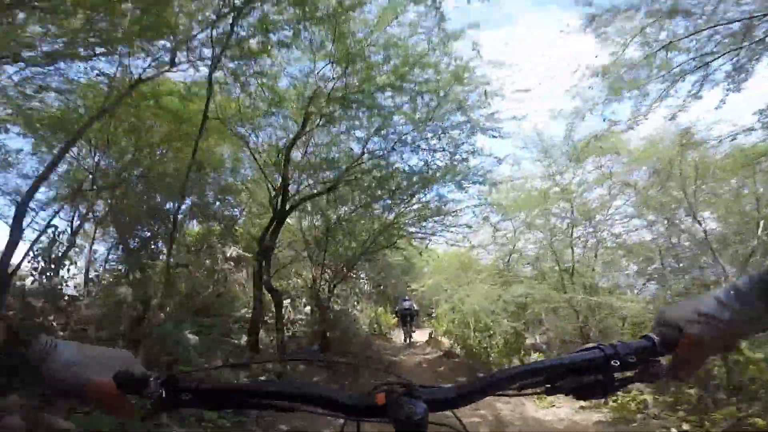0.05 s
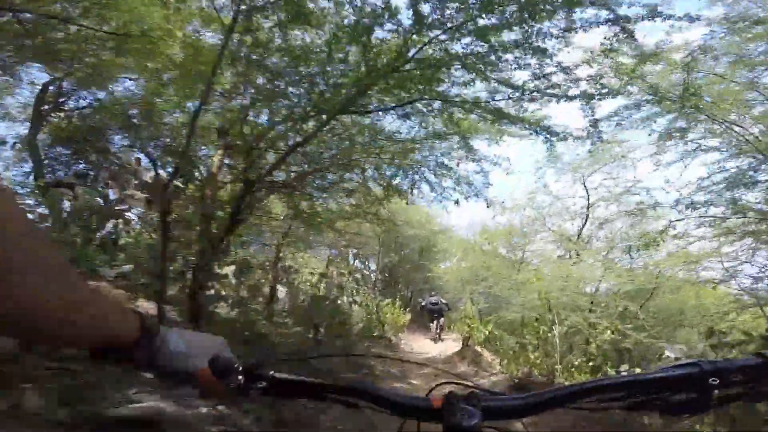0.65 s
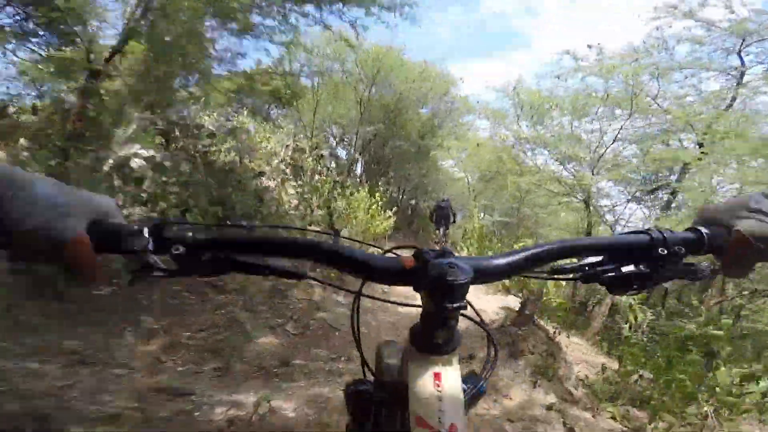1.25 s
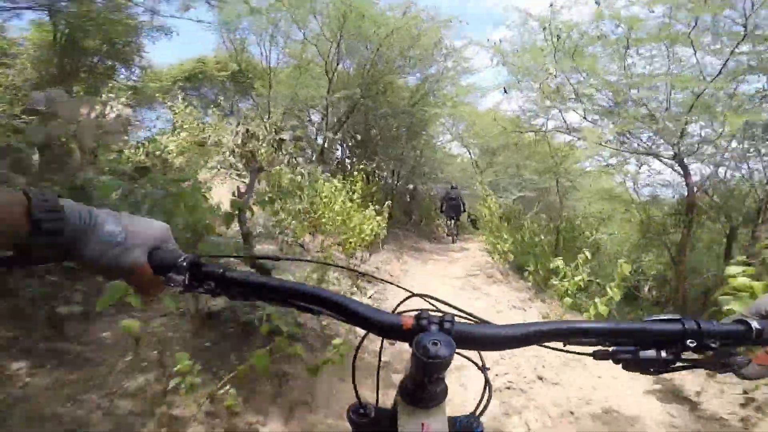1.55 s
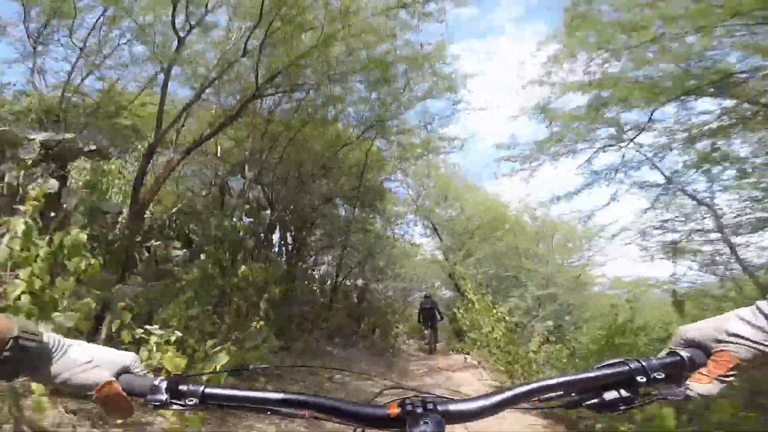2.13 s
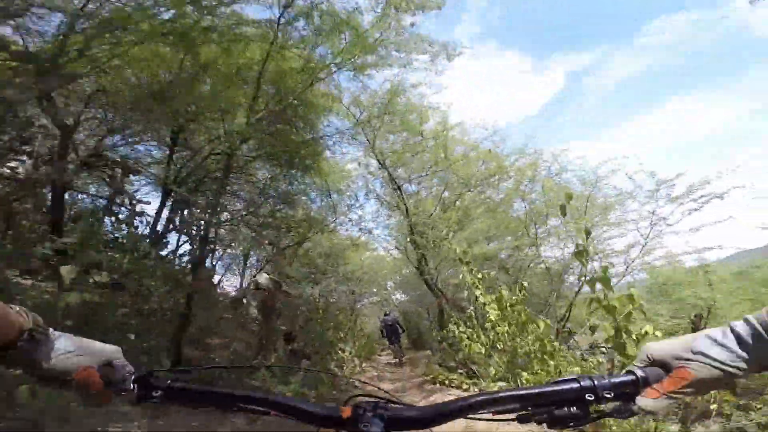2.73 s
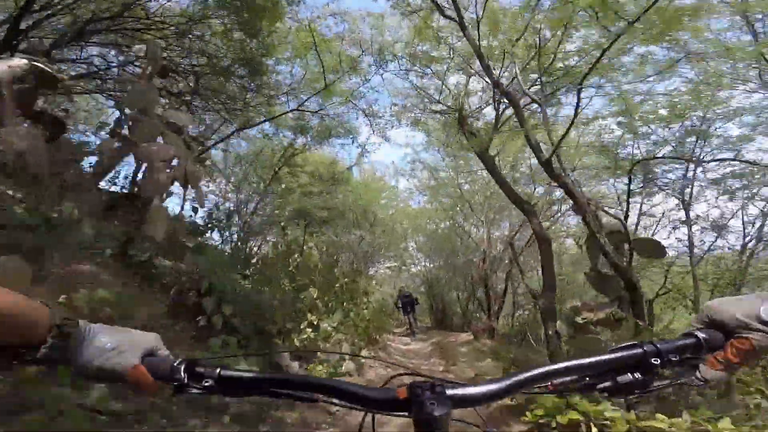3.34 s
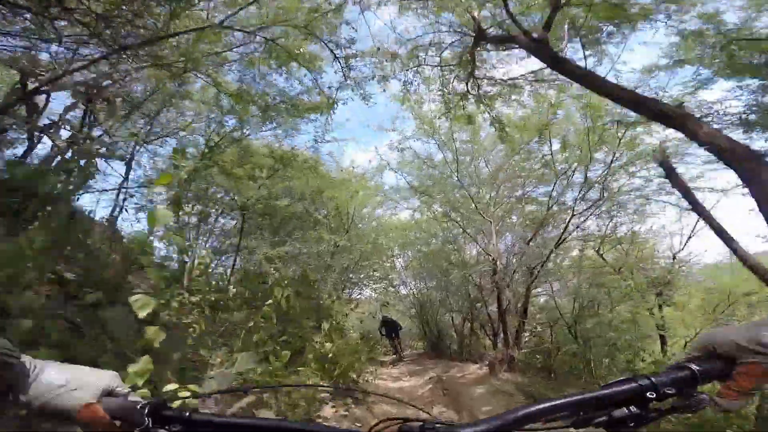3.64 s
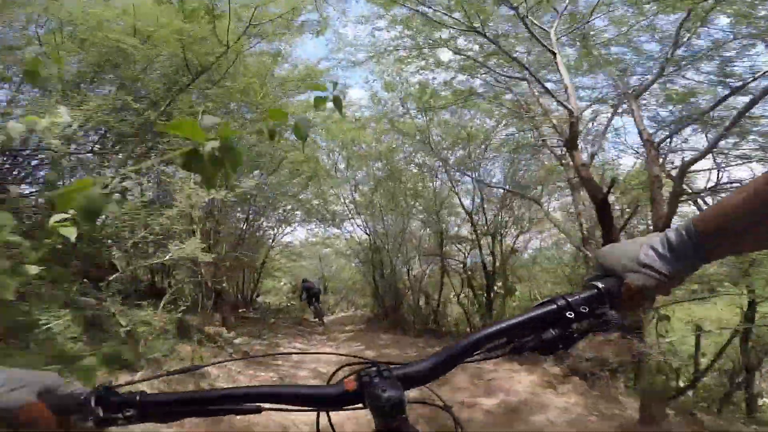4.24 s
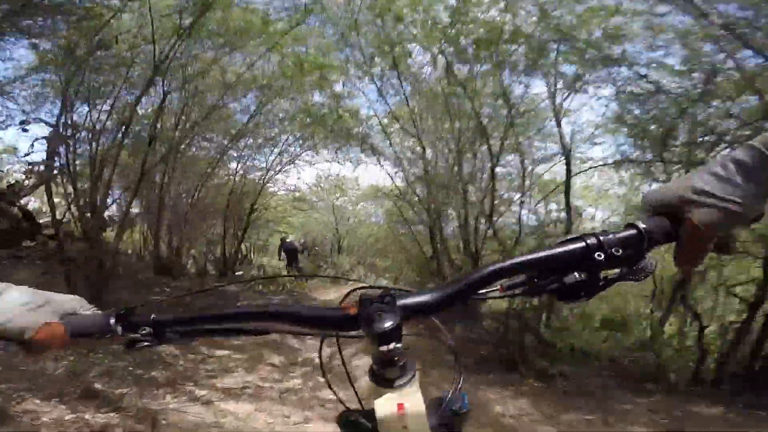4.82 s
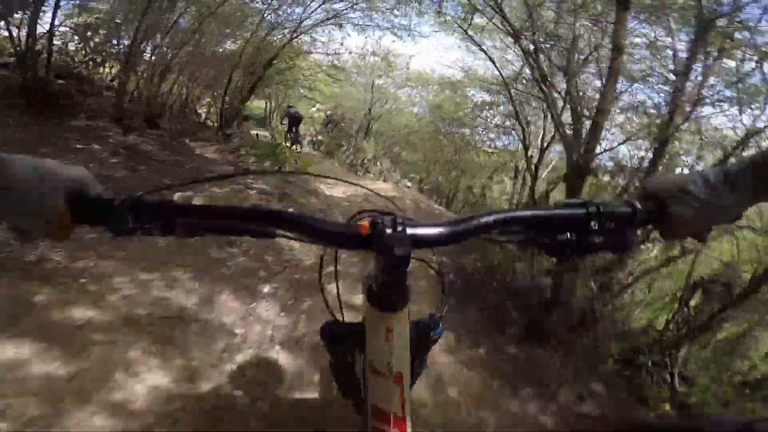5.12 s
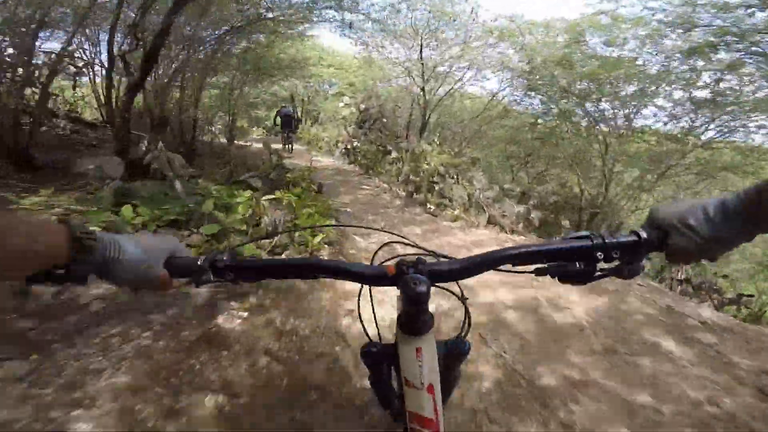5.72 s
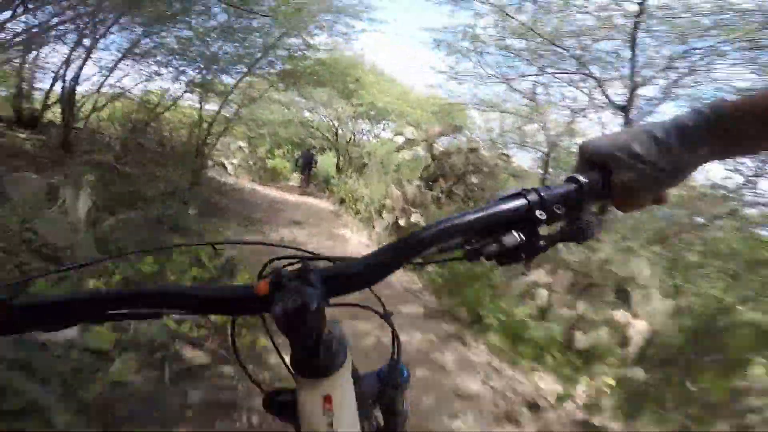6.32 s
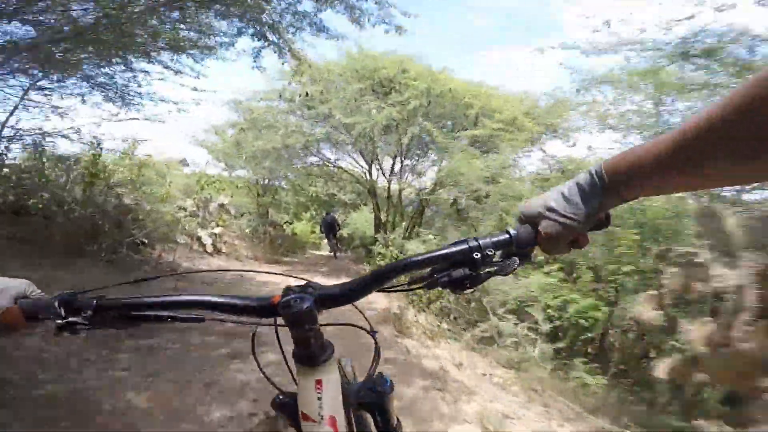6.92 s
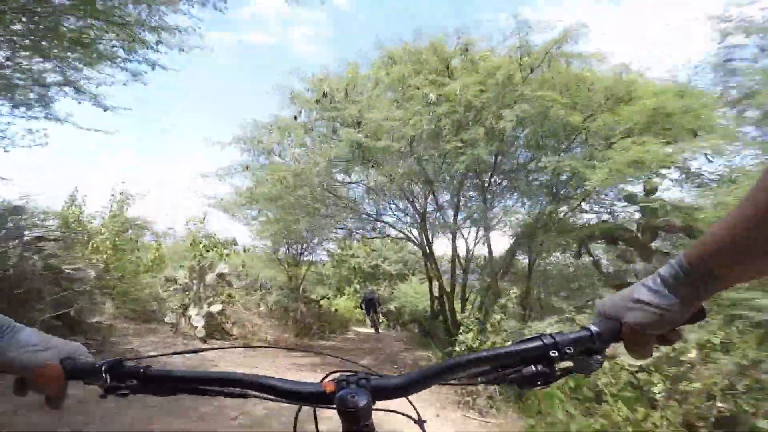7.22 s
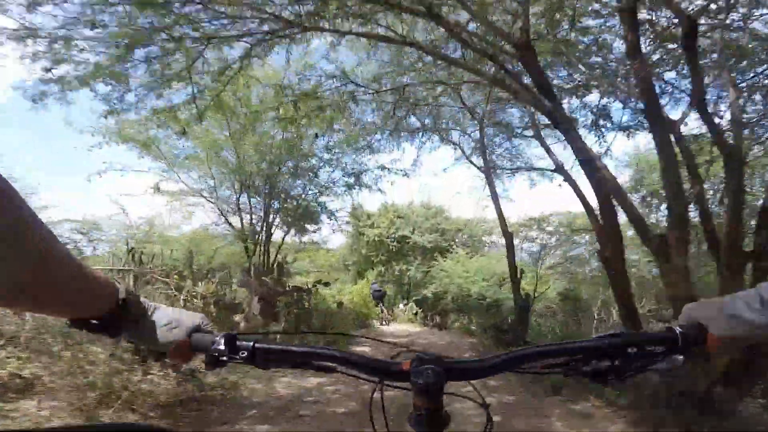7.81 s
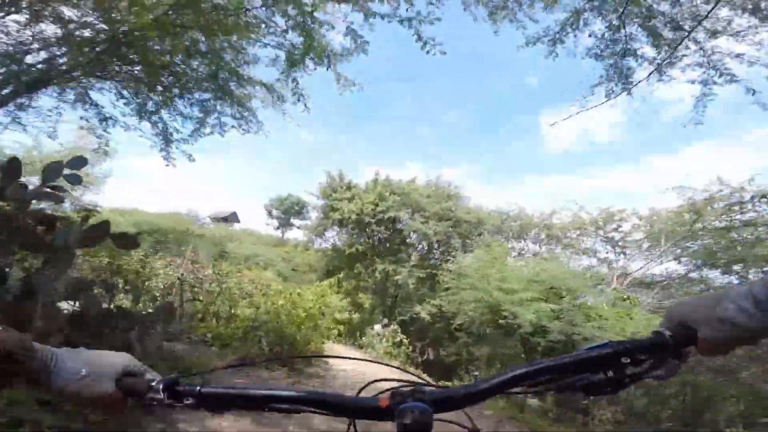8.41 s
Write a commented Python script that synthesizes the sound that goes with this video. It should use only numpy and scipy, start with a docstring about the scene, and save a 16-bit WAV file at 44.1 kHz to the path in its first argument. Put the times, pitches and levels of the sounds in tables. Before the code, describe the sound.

A mountain bike rolls fast over gritty dirt with knocks, chain ticks and a buzzing freehub under loud, gusting wind rumble.

```python
"""Wind rumbles, buffets and slaps on a chest-worn microphone as a mountain bike coasts down a dirt trail.
Low thuds, from wind slaps or bumps, fall in pitch with hollow knocks. Tyres crunch over grit, and hoarse,
breath-like whirs swell and fade. Freehub pawls buzz, chain and cables tick, metal pings, and three hard
snaps and two faint ones ring out. The brakes hiss lightly. A limiter holds the gusts down."""
import sys
import numpy as np
from scipy import signal
from scipy.fft import rfft, irfft, next_fast_len
from scipy.io import wavfile
from scipy.ndimage import uniform_filter1d, minimum_filter1d

SR = 44100
rng = np.random.default_rng(int(sys.argv[2]) if len(sys.argv) > 2 else 0)


def generate_wav(sig):
    """Save sig (samples, or channels by samples) to the path in sys.argv[1] as 16-bit PCM at SR."""
    pcm = np.round(np.clip(np.atleast_2d(sig).T, -1, 1) * 32767).astype(np.int16)
    wavfile.write(sys.argv[1], SR, pcm)


N = 381906

# air speed as rumble, turbulence as buffeting: t/s, relative level/dB
AIR_SPEED = [(0, -25.5), (.17, -16), (.36, -16), (.42, -12.5), (.58, -16), (.67, -15), (.81, -19),
             (.89, -13), (1.16, -16.5), (1.26, -14), (1.58, -16.5), (1.76, -15), (1.82, -17), (1.93, -15.5),
             (2.18, -22), (2.29, -27), (2.38, -30), (2.41, -24), (2.53, -13), (2.63, -20), (2.78, -12.5),
             (2.98, -16.5), (3.06, -16), (3.27, -17.5), (3.32, -23), (3.41, -15.5), (3.8, -18), (4.15, -16),
             (4.25, -14.5), (4.45, -18), (4.66, -18), (4.72, -10.5), (4.83, -14), (4.89, -15), (4.95, -14),
             (5.04, -19), (5.09, -11), (5.49, -17.5), (5.54, -14), (5.68, -11), (5.83, -12), (5.99, -10.5),
             (6.24, -12.5), (6.31, -15.5), (6.5, -14.5), (6.56, -19), (6.73, -12.5), (6.9, -12.5),
             (6.97, -17), (7.04, -14), (7.17, -16.5), (7.25, -15), (7.33, -17), (7.52, -16.5),
             (7.64, -12.5), (7.98, -18), (8.13, -14.5), (8.21, -26), (8.38, -15), (8.5, -21.5),
             (8.64, -15.5)]
TURBULENCE = [(0.0, -24.5), (0.12, -33.5), (0.24, -26), (1.12, -27.5), (1.36, -21.5), (1.52, -33),
              (1.7, -32), (2.0, -22), (2.32, -35), (2.48, -25), (2.64, -33), (2.9, -39), (3.0, -22.5),
              (3.1, -31.5), (3.32, -28), (3.42, -24.5), (3.75, -31.5), (3.92, -25.5), (4.4, -30),
              (4.88, -25.5), (5.08, -29.5), (5.3, -27), (5.42, -37), (5.58, -30), (5.8, -29), (6.2, -40),
              (6.48, -35.5), (6.66, -26.5), (6.84, -38), (7.0, -25.5), (7.14, -40.5), (7.52, -30),
              (7.8, -25.5), (8.0, -25), (8.22, -31), (8.36, -27.5), (8.65, -26.5)]
# large and small eddies: f/Hz, density/dB
RUMBLE_SPECTRUM = [(12, -0.5), (22, 4), (45, 0.5), (70, -3), (95, -5), (122, -6.5), (142, -12.5),
                   (170, -19.5), (300, -105)]
BUFFET_SPECTRUM = [(120, -8), (165, 3), (250, -2.5), (380, -7.5), (520, -13.5), (750, -22), (1200, -48)]

def wind(rumble_trim_db=2, buffet_trim_db=1):
    """Large eddies rock the diaphragm; small ones tear off in quick puffs."""
    eddies = rng.standard_normal(N) * from_db(2.5 * drift(rate_hz=21))
    rumble = even(colour(eddies, RUMBLE_SPECTRUM), span_s=0.049)
    puffs = rng.standard_normal(N) * from_db(3 * drift(rate_hz=35))
    buffet = even(colour(puffs, BUFFET_SPECTRUM), span_s=0.065)
    rumble_db = curve(AIR_SPEED) + rumble_trim_db + 1.2 * drift(rate_hz=8.4)
    buffet_db = curve(TURBULENCE) + buffet_trim_db + 1.5 * drift(rate_hz=8.6)
    return from_db(rumble_db) * rumble + from_db(buffet_db) * buffet


# single eddies: centre t/s, peak level/dB, f/Hz
SLAPS = [(.28, -13, 273), (0.944, -20.5, 210), (1.971, -17.5, 231), (2.53, -16.5, 248), (2.552, -21, 245),
         (2.975, -17.5, 234), (3.056, -14.5, 194), (3.4, -13, 210), (3.538, -16.5, 327), (3.81, -24.5, 266),
         (4.088, -12, 187), (4.578, -14, 206), (4.705, -14.5, 184), (4.89, -20, 231), (5.555, -16, 208),
         (5.819, -14.5, 202), (5.984, -13, 222), (8.397, -12.5, 182.6)]

def slaps(length_s=0.032, tear_hz=450, tear_db=-13):
    """An eddy hits the microphone port; the air in it swings a few times, with a tearing edge."""
    out, swell = np.zeros(N), np.hanning(int(length_s * SR))
    t = np.arange(len(swell)) / SR
    for s, db, hz in SLAPS:
        swing = np.sin(2 * np.pi * (hz * t + rng.random()))
        tear = rms_one(resonate_twice(rng.standard_normal(SR // 5), tear_hz, width_hz=260))[-len(t):]
        add(out, s - length_s / 2, peak_at(swell * (swing + from_db(tear_db) * tear), db))
    return out


# gusts: centre t/s, half-length/s, level/dB, top f/Hz
GUSTS = [(1.331, 0.041, -22, 428), (3.453, 0.015, -36, 390), (3.639, 0.015, -24, 414),
         (4.191, 0.014, -29, 453), (5.125, 0.067, -27, 650), (5.316, 0.022, -34, 530),
         (6.548, .026, -24, 544), (6.645, .04, -37.5, 640), (6.716, 0.011, -29, 523),
         (6.99, 0.026, -31, 510), (5.972, 0.028, -27, 646), (7.375, .018, -31.5, 757),
         (7.858, 0.039, -21, 561), (8.02, 0.022, -33, 428)]

def gusts(lift_octaves=0.585):
    """A gust tears at the port: a short roar whose pitch follows its strength."""
    out, roar = np.zeros(N), hoarse(rng.standard_normal(N), width_hz=380)
    for s, half_s, db, hz in GUSTS:
        swell = np.hanning(int(2 * half_s * SR))
        span = (int(s * SR) + np.arange(len(swell))) % N
        pitch_hz = hz * 2 ** (lift_octaves * (swell - 1))
        add(out, s - half_s, from_db(db) * swell * on_pitch(roar[span], pitch_hz))
    return out


# low thuds with hollow knocks: t/s, thud level/dB, final thud f/Hz, knock level/dB, knock f/Hz
THUDS = [(.169, -19.5, 328, -14.5, 1300), (0.176, -26, 318, -14.5, 1500), (0.184, -18.5, 320, -20.5, 1160),
         (.32, -17.5, 290, -23, 1180), (.457, -13, 306, -16.5, 1030), (0.54, -17.5, 337, -42, 1310),
         (0.666, -12.5, 277, -23, 850), (.753, -26, 453, -29, 800), (.76, -5.5, 253, -18, 1360),
         (0.857, -15.5, 287, -28, 900), (1.776, -6.5, 240, -21, 970), (1.965, -35, 302, -20, 930),
         (2.041, -24, 360, -18.5, 1340), (2.147, -22, 305, -20, 1400), (2.41, -39, 300, -22.5, 1000),
         (2.639, -31, 303, -26.5, 1350), (2.97, -39, 303, -19, 1300), (2.997, -24, 296, -19.5, 1190),
         (3.132, -13, 266, -27, 900), (3.244, -32, 300, -20.5, 1070), (3.28, -37, 300, -21, 1300),
         (3.487, -16, 372, -16.5, 1040), (3.501, -23, 325, -18.5, 1320), (3.72, -13, 295, -18.5, 1250),
         (3.803, -17, 348, -20, 1260), (3.94, -32, 304, -17.5, 1250), (4.039, -24, 380, -17.5, 1250),
         (4.047, -31, 345, -24, 860), (4.373, -38, 300, -24, 1530), (4.436, -12.5, 272, -13.5, 1020),
         (4.847, -28, 300, -18, 1750), (4.983, -39, 298, -20, 1350), (5.095, -30, 523, -9, 950),
         (5.105, -13.5, 400, -18, 900), (5.148, -30, 490, -18, 796), (5.243, -23, 470, -41, 800),
         (5.457, -32, 475, -21.5, 750), (5.643, -17, 470, -27, 650), (5.654, -10, 312, -26, 590),
         (5.66, -13.5, 488, -14.5, 740), (5.734, -36, 300, -20.5, 1370), (5.812, -24, 300, -18, 1110),
         (5.876, -44, 300, -28, 1160), (5.958, -21, 400, -24, 674), (5.979, -18.5, 452, -16, 760),
         (6.036, -39, 300, -26, 1150), (6.134, -22.5, 296, -23, 750), (6.17, -37, 300, -25.5, 1000),
         (6.174, -39, 300, -16.5, 1200), (6.203, -41, 300, -17.5, 1250), (6.302, -45, 300, -21, 1150),
         (6.333, -34, 302, -18, 955), (6.344, -40, 295, -17, 1110), (6.971, -19, 430, -28, 720),
         (7.709, -11, 292, -23, 715), (7.836, -9.5, 238, -12.5, 1020), (7.872, -11, 282, -34, 700),
         (8.273, -22, 400, -27, 835), (8.336, -14, 282, -18, 1090), (8.494, -18.5, 306, -18.5, 1490)]

def thuds(start_ratio=3.36, fall_s=0.001513, rise_s=0.0044, scuff_db=-10):
    """Low thuds, from wind slaps or bumps, swell and fall in pitch, each with a hollow knock."""
    out, t = np.zeros(N), np.arange(SR // 10) / SR
    swell = (t / rise_s * np.exp(1 - t / rise_s)) ** 2
    for s, thud_db, thud_hz, knock_db, knock_hz in THUDS:
        pitch_hz = thud_hz * (1 + (start_ratio - 1) * np.exp(-t / fall_s))
        thud = np.sin(2 * np.pi * (np.cumsum(pitch_hz) / SR + rng.random())) * swell
        scuff = resonate(resonate(burst(t60_s=0.063), hz=423, width_hz=320), hz=506, width_hz=83)
        add(out, s, peak_at(thud, thud_db) + peak_at(scuff, thud_db + scuff_db))
        add(out, s, knock(knock_hz, knock_db))
    return out


def jolts(trim_db, db_per_octave=5.5, reference_hz=1150):
    """Shake from each knock as (t/s, level/dB); hard, high ones stir up more than dull ones."""
    return [(s, db + trim_db + db_per_octave * np.log2(hz / reference_hz)) for s, _, _, db, hz in THUDS]


# hollow frame: f/Hz, level/dB
FRAME_MODES = [(570, -0.5), (720, 4), (920, -1.5), (1160, -4), (1400, -2.5), (1610, -3.5), (1830, -5),
               (2100, -10.5)]

def knock(hz, db, t60_s=0.011, focus_db=14, uneven_db=2.5, detune=0.036, gap_s=0.004, loss_db=9):
    """A contact and two uneven bounces strike the frame's damped modes, most of all those near hz."""
    out, t = np.zeros(SR // 5), np.arange(SR // 25) / SR
    mode_hz, mode_db = np.transpose(FRAME_MODES)
    focused_db = mode_db - focus_db * np.log2(mode_hz / hz) ** 2
    count = len(mode_hz)
    for bounce in range(3):
        gains = from_db(focused_db + uneven_db * rng.standard_normal(count))
        pitches_hz = mode_hz * (1 + detune * rng.standard_normal(count))
        body = (gains * rng.choice([-1, 1], count)) @ np.sin(2 * np.pi * np.outer(pitches_hz, t))
        contact = (t == 0) + 0.28 * np.tanh(burst(t60_s=0.018)[:len(t)])  # impulse plus rattle
        hit = signal.fftconvolve(body * from_db(-60 * t / t60_s), contact)
        add(out, gap_s * bounce * rng.uniform(0.76, 1.1), peak_at(hit, db - loss_db * bounce))
    return out


# tyre grip as crunch between knocks: t/s, relative level/dB
GRIP = [(0.0, -38), (0.84, -36.5), (1.04, -40), (1.36, -35.5), (3.16, -41.5), (3.28, -34.5), (3.64, -41),
        (3.84, -36), (4.2, -40.5), (4.36, -35), (5.16, -38.5), (5.32, -42), (6.32, -37), (6.48, -40.5),
        (7.52, -39.5), (7.92, -34), (8.24, -37.5), (8.65, -32.5)]
# crunch: f/Hz, density/dB
TYRE_SPECTRUM = [(300, 3), (620, 7), (850, 1), (1150, 1), (1650, 1), (2100, -5.5), (2700, -12),
                 (3400, -21.5), (6000, -21.5)]

def tyres(trim_db=0.5, dust_gain=0.97, patchy_db=2):
    """Knobs crush patches of grit over a scrub of dust, louder around each jolt."""
    level_db = stirred(curve(GRIP) + trim_db, jolts(trim_db=-18), attack_s=0.009, release_s=0.034)
    grit = grains(per_s=1200, spread_db=0) + dust_gain * rng.standard_normal(N)
    level_db -= 0.13 * drift(rate_hz=10)
    crunch = colour(grit * from_db(patchy_db * drift(rate_hz=27)), TYRE_SPECTRUM)
    return from_db(level_db) * even(crunch, span_s=0.086)


# breath-like whirs: centre t/s, half-length/s, level/dB, f/Hz, rise/(octaves/s)
WHIRS = [(0.513, 0.068, -37, 1280, 1.5), (0.581, 0.018, -37.5, 1900, 0), (0.821, 0.096, -41.5, 1720, 0),
         (1.735, 0.2, -41, 1680, 0), (2.665, 0.038, -38, 1600, 0.14), (2.735, 0.06, -40, 1640, 0.26),
         (2.76, .13, -44.5, 1863, 0.1), (3.768, 0.06, -35, 1680, 0.14), (3.9, 0.09, -40, 1570, 0.11),
         (4.826, 0.029, -34, 1660, 0.29), (6.244, 0.22, -41.5, 1078, 0.17), (7.025, 0.052, -35, 1050, 1.86),
         (8.522, 0.077, -37, 1600, 0.19)]

def whirs(waver=0.025, rasp_db=3):
    """Hoarse, wavering, breath-like whirs swell and fade."""
    out = np.zeros(N)
    rasp = hoarse(grains(per_s=900, spread_db=2), width_hz=280) * from_db(rasp_db * drift(rate_hz=50))
    bend = 1 + waver * drift(rate_hz=9.1)
    for s, half_s, db, hz, octaves_per_s in WHIRS:
        swell = np.hanning(int(2 * half_s * SR))
        steps = np.arange(len(swell))
        span = (int(s * SR) + steps) % N
        pitch_hz = hz * bend[span] * 2 ** (octaves_per_s * (steps / SR - half_s))
        add(out, s - half_s, from_db(db) * swell * on_pitch(rasp[span], pitch_hz))
    return out


# metal snaps: t/s, rms level/dB, t60/s, knock level/dB, contact cut-off f/Hz, crack f/Hz
SNAPS = [(1.8943, -24, .013, -32, 12000, 13200), (1.988, -42, .02, -45, 12000, 7000),
         (3.3208, -26.5, .013, -30, 3200, 7400), (4.378, -39, .03, -40, 12000, 13000),
         (5.7029, -23.5, .017, -12.5, 9500, 8800)]
# snapping metal: f/Hz, width/Hz, level/dB
METAL_MODES = [(2000, 600, 22), (4110, 630, 21.5), (5400, 1330, 19.5), (7670, 660, 12), (13800, 1100, 11)]

def snaps(crack_db=9, rms_span_s=0.015):
    """Hard contacts ring the metal for a few milliseconds and jolt the frame."""
    out = np.zeros(N)
    for s, db, t60_s, knock_db, cutoff_hz, crack_hz in SNAPS:
        blow = butter(np.tanh(burst(t60_s)), cutoff_hz, order=1)  # tanh: first contacts equally hard
        ring = sum((-1) ** k * from_db(mode_db) * resonate_twice(blow, hz, 2 * width_hz)
                   for k, (hz, width_hz, mode_db) in enumerate(METAL_MODES))
        crack = resonate_twice(np.tanh(burst(t60_s)), crack_hz, width_hz=3000)
        crack = from_db(crack_db) * butter(crack, cutoff_hz, order=1)
        snap = butter(ring + crack, hz=2000, order=6, kind="high")
        add(out, s, from_db(db) * snap / np.std(snap[:int(rms_span_s * SR)]))
        add(out, s, knock(hz=950, db=knock_db))
    return out


# chain and cable touches: t/s, peak level before low-pass/dB, f/Hz
TICKS = [(0.172, -37, 5260), (0.182, -42, 4700), (0.335, -25.5, 5270), (.422, -28.5, 4130),
         (0.87, -26, 4300), (0.948, -31, 3950), (1.04, -24.5, 5170), (1.044, -30, 3100), (1.102, -31, 5570),
         (1.172, -31, 5700), (1.253, -28.5, 5760), (1.323, -30, 4660), (1.408, -23.5, 4300),
         (1.498, -26, 4370), (1.535, -39, 3700), (1.607, -29, 4450), (1.735, -27, 2870), (1.902, -29, 5600),
         (1.989, -29, 6040), (2.147, -34, 6000), (2.208, -24, 4000), (3.262, -33, 2700), (4.03, -33, 3000),
         (3.331, -26, 4270), (4.353, -25, 4250), (4.379, -23, 4800), (4.439, -34, 3650),
         (4.551, -20.5, 4160), (4.982, -25, 4600), (5.177, -28, 5470), (5.821, -34, 5900),
         (5.94, -27, 5100), (6.875, -29, 6360), (6.932, -27, 2940), (6.962, -35, 2800), (7.837, -39, 4370),
         (7.94, -21.5, 5500), (7.942, -25, 2500), (8.319, -30, 5200), (8.335, -26, 3950),
         (8.446, -26.5, 5430), (8.493, -29, 2900)]

def ticks(width_hz=2800, ring_db=4):
    """Chain and cables tap the frame: a dry crack with a brief ring."""
    out = np.zeros(N)
    for s, db, hz in TICKS:
        crack = resonate(resonate(burst(t60_s=0.024), hz, width_hz), hz, 2 * width_hz)
        ring = from_db(ring_db) * resonate(crack, hz, width_hz=300)
        add(out, s, peak_at(crack + ring, db))
    return butter(out, hz=6800, order=6)


# flicked spokes and levers: t/s, peak level/dB, f/Hz
PINGS = [(0.171, -29, 5380), (3.308, -33, 4000), (5.147, -44, 10200), (6.933, -35, 3140),
         (7.942, -29, 5820), (1.99, -39.5, 7100)]

def pings(t60_s=0.049):
    """Thin metal rings briefly on one clear note."""
    out, t = np.zeros(N), np.arange(SR // 10) / SR
    for s, db, hz in PINGS:
        add(out, s, from_db(db - 60 * t / t60_s) * np.sin(2 * np.pi * hz * t))
    return out


# coasting freehub and chain: t/s, relative level/dB
COAST = [(0.0, -49), (0.67, -51.5), (1.21, -45.5), (1.98, -44), (2.39, -48.5), (4.24, -49), (4.94, -44),
         (5.35, -48.5), (6.15, -43.5), (6.51, -48.5), (7.35, -52.5), (8.01, -44), (8.32, -46.5),
         (8.66, -41)]
# their buzz: f/Hz, density/dB
HUB_SPECTRUM = [(2400, 5.5), (3300, -3), (3650, -1), (3950, 5), (4400, 2), (5600, 0.5), (6400, 1.5),
                (7200, -40), (8500, -23), (11000, -35), (15000, -27)]

def drivetrain(trim_db=-1, pawls_per_s=290, pawl_gain=0.15, jiggle_db=-16):
    """Pawls skip over the ratchet and chain links jiggle, louder around each tick and jolt."""
    shakes = [(s, db + jiggle_db) for s, db, _ in TICKS] + jolts(trim_db=-25)
    level_db = stirred(curve(COAST) + trim_db, shakes, attack_s=0.008, release_s=0.018)
    skips = pulses(pawls_per_s * (1 + 0.074 * drift(rate_hz=1.9)))
    pawls = rms_one(skips * from_db(0.87 * drift(rate_hz=150)))
    jiggle = signal.fftconvolve(grains(per_s=110, spread_db=6), burst(t60_s=0.016))[:N]
    links = rms_one(jiggle * rng.standard_normal(N))
    buzz = pawl_gain * pawls + links + rng.standard_normal(N)
    return from_db(level_db) * even(colour(buzz, HUB_SPECTRUM), span_s=0.017)


# pad drag on the discs: t/s, level/dB
DRAG = [(0, -52.5), (.4, -68), (4.0, -59.5), (5.0, -54), (5.4, -55.5), (6.12, -46.5), (6.5, -53.5),
        (7.2, -61), (8.66, -90)]
# spans of high sizzle, the middle one only faint background hiss: on t/s, off t/s, level/dB
SIZZLES = [(5.34, 6.22, -59), (6.2, 7.8, -71), (7.85, 8.7, -63)]
# disc ring, high sizzle: f/Hz, density/dB
DISC_SPECTRUM = [(4500, -22), (5900, 10.5), (6600, 15), (7400, -9), (8900, 3.5), (10000, -32)]
SIZZLE_SPECTRUM = [(10800, -35), (12200, -5), (13400, -8), (15000, -22)]

def brakes(holes_per_s=420, hole_gain=0.26, rise_s=0.15, fall_s=0.09, ring_db=-5, hz_per_db=28):
    """Disc holes rasp past the pads; discs ring higher with more drag; a high sizzle comes and goes."""
    t, drag_db = np.arange(N) / SR, curve(DRAG)
    passes = pulses(holes_per_s * (1 + 0.11 * drift(rate_hz=4.7)))
    holes = rms_one(passes * rng.standard_normal(N))
    rasp = (hole_gain * holes + rng.standard_normal(N)) * from_db(2 * drift(rate_hz=7.1))
    ring_hz = 6450 + hz_per_db * (drag_db + 51)
    ring = on_pitch(hoarse(rasp, width_hz=400), ring_hz)
    discs = colour(rasp, DISC_SPECTRUM) + from_db(ring_db) * ring
    sizzle_gain = sum(from_db(db) * np.interp(t, [on, on + rise_s, off, off + fall_s], [0, 1, 1, 0])
                      for on, off, db in SIZZLES)
    sizzle = colour(rasp * from_db(4 * drift(rate_hz=90)), SIZZLE_SPECTRUM)
    return from_db(drag_db) * discs + sizzle_gain * sizzle


# passing air: t/s, level/dB
RUSH_LEVEL = [(0, -51.5), (3, -51), (5.1, -51.5), (5.75, -56.5), (6.6, -58.5), (7.3, -57), (8.0, -50.5),
              (8.66, -52.5)]
# its hiss: f/Hz, density/dB
RUSH_SPECTRUM = [(3000, 7.5), (6300, 8), (7500, -0.5), (8600, 6.5), (10200, 3), (11500, -2.5),
                 (13000, -2.5), (15000, -14)]

def rush():
    """Passing air hisses, thin and smooth."""
    return from_db(curve(RUSH_LEVEL)) * colour(rng.standard_normal(N), RUSH_SPECTRUM)


def from_db(db):
    """Decibels to gain."""
    return 10 ** (np.asarray(db) / 20)


def rms_one(x):
    """Scale to unit power."""
    return x / np.sqrt(np.mean(x ** 2) + 1e-20)


def peak_at(x, db):
    """Scale to a peak level."""
    return from_db(db) * x / np.abs(x).max()


def curve(rows):
    """Interpolate (t/s, value) rows at every sample."""
    return np.interp(np.arange(N) / SR, *np.transpose(rows))


def add(out, s, sound):
    """Mix a sound in at time s."""
    at = max(0, int(s * SR))
    out[at:at + len(sound)] += sound[:max(0, N - at)]


def stirred(steady_db, events, attack_s, release_s):
    """Steady level plus a surge around each (t/s, level/dB) event, in dB."""
    power, t = np.zeros(N), np.arange(-SR // 8, SR // 3) / SR
    surge = np.exp(-2 * np.abs(t) / np.where(t < 0, attack_s, release_s))
    for s, db in events:
        add(power, s + t[0], from_db(db) ** 2 * surge)
    return 10 * np.log10(from_db(steady_db) ** 2 + power)


def drift(rate_hz, hop=40, warm_up=2000):
    """Smooth random wander, unit spread."""
    pole = np.exp(-2 * np.pi * rate_hz * hop / SR)
    noise = rng.standard_normal(N // hop + warm_up + 2)
    slow = signal.lfilter([1], [1, -2 * pole, pole * pole], noise)[warm_up:]
    return np.interp(np.arange(N) / hop, np.arange(len(slow)), rms_one(slow))


def pulses(per_s):
    """One click per cycle of a varying rate."""
    return np.diff(np.floor(np.cumsum(per_s) / SR), prepend=0)


def grains(per_s, spread_db):
    """Randomly timed clicks; spread_db makes a few much larger."""
    sizes = from_db(spread_db * np.minimum(rng.exponential(1, N), 4)) * rng.choice([-1, 1], N)
    return rms_one(sizes * (rng.random(N) < per_s / SR))


def burst(t60_s):
    """A dying flurry of tiny contacts."""
    t = np.arange(SR // 10) / SR
    return rng.standard_normal(len(t)) * from_db(-60 * t / t60_s)


def colour(x, spectrum):
    """Apply a spectrum, falling 20 dB/octave past its ends; unit power."""
    hz, db = np.transpose(spectrum)
    size = next_fast_len(N)
    bin_hz = np.maximum(np.arange(size // 2 + 1) * SR / size, 1)
    octaves_outside = np.abs(np.log2(bin_hz / np.clip(bin_hz, hz[0], hz[-1])))
    gain = from_db(np.interp(np.log(bin_hz), np.log(hz), db) - 20 * octaves_outside)
    return rms_one(irfft(rfft(x, size) * gain, size)[:N])


def even(x, span_s):
    """Hold power steady over spans longer than span_s."""
    size = int(span_s * SR)
    power = uniform_filter1d(uniform_filter1d(x * x, size), size)
    return x / np.sqrt(np.abs(power) + 1e-9)


def butter(x, hz, order, kind="low"):
    """Low- or high-pass with a flat passband."""
    return signal.sosfilt(signal.butter(order, hz, kind, fs=SR, output="sos"), x)


def resonate(x, hz, width_hz):
    """Resonance with unit peak gain."""
    r = np.exp(-np.pi * width_hz / SR)
    feedback = [1, -2 * r * np.cos(2 * np.pi * hz / SR), r * r]
    return signal.lfilter(np.array([1, 0, -1]) * (1 - r * r) / 2, feedback, x)


def resonate_twice(x, hz, width_hz):
    """Two equal resonances in series."""
    return resonate(resonate(x, hz, width_hz), hz, width_hz)


def hoarse(source, width_hz):
    """Rough narrowband ringing around 0 Hz, for on_pitch."""
    return butter(source * np.exp(2j * np.pi * rng.random(len(source))), width_hz / 2, order=2)


def on_pitch(ringing, hz):
    """Shift a ringing onto a pitch curve; unit power."""
    return rms_one(np.real(ringing * np.exp(2j * np.pi * np.cumsum(hz) / SR)))


def scene():
    """Wind on the microphone and the ride just below it, in open air; mono."""
    ride = tyres() + whirs() + drivetrain() + thuds() + ticks() + pings() + snaps() + brakes()
    air = wind() + gusts() + slaps() + rush()
    return (air + ride)[None]


def record(dry, ceiling=0.6, hold_s=0.0044, cutoff_hz=15400):
    """A fast limiter rides the low swings; a steep low-pass cuts the top."""
    hold = int(hold_s * SR)
    swing = np.abs(uniform_filter1d(dry, size=64))
    gain = ceiling / np.maximum(swing, ceiling)
    gain = uniform_filter1d(minimum_filter1d(gain, hold), hold)
    return signal.sosfilt(signal.ellip(12, 0.1, 90, cutoff_hz, fs=SR, output="sos"), dry * gain)


dry = scene()
out = record(dry)
generate_wav(out)
```